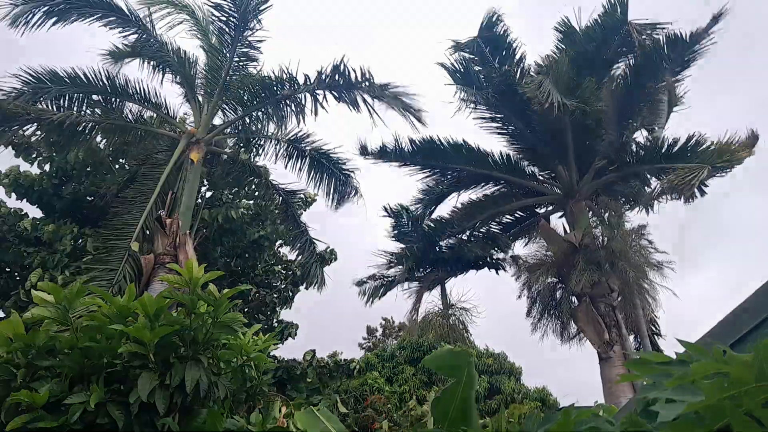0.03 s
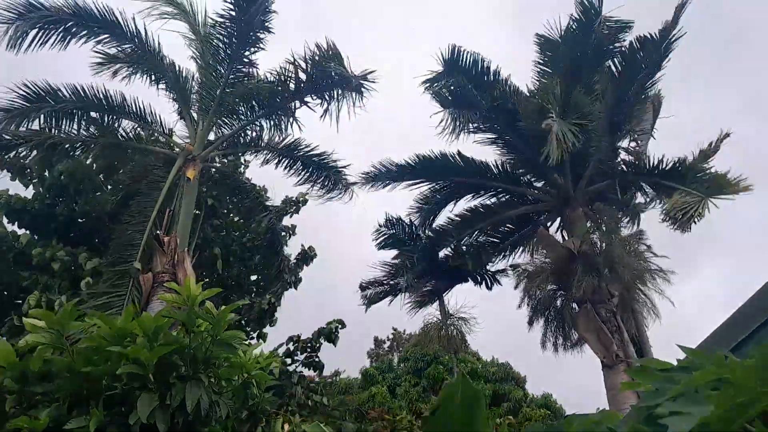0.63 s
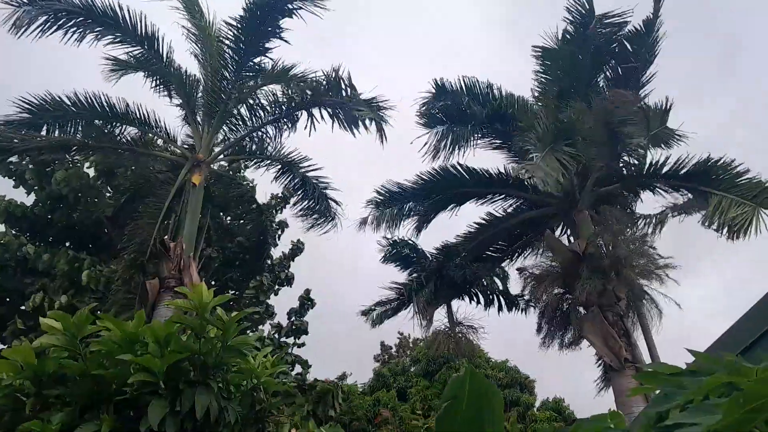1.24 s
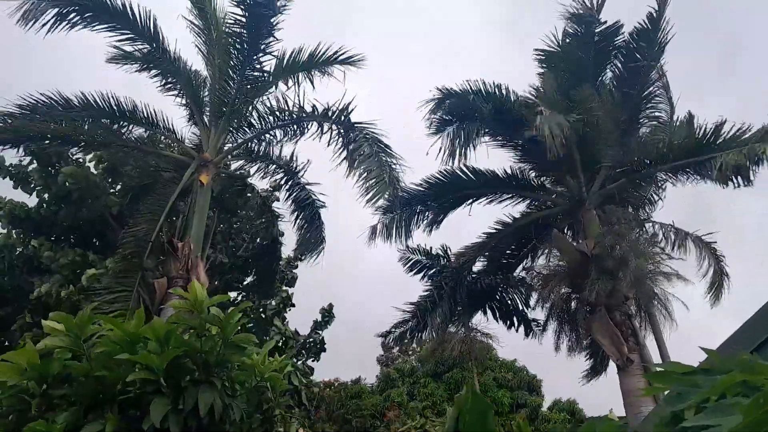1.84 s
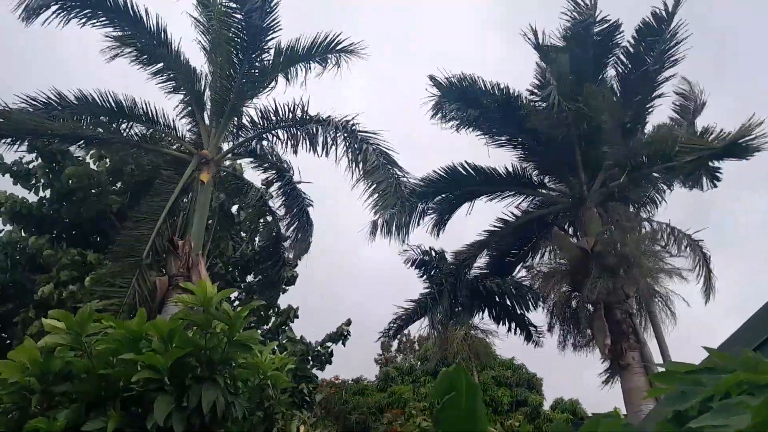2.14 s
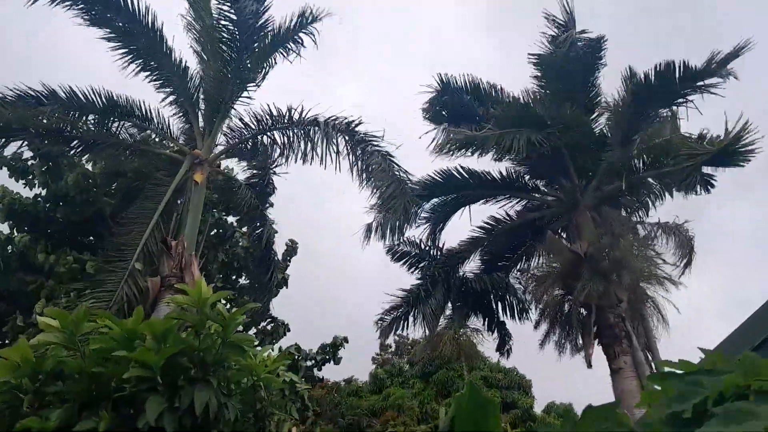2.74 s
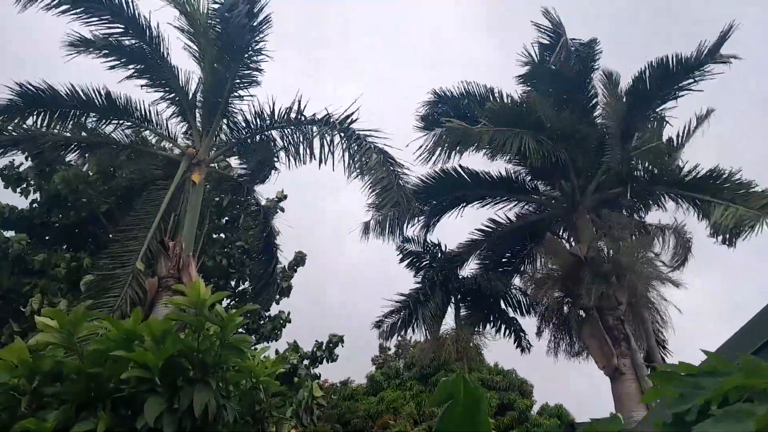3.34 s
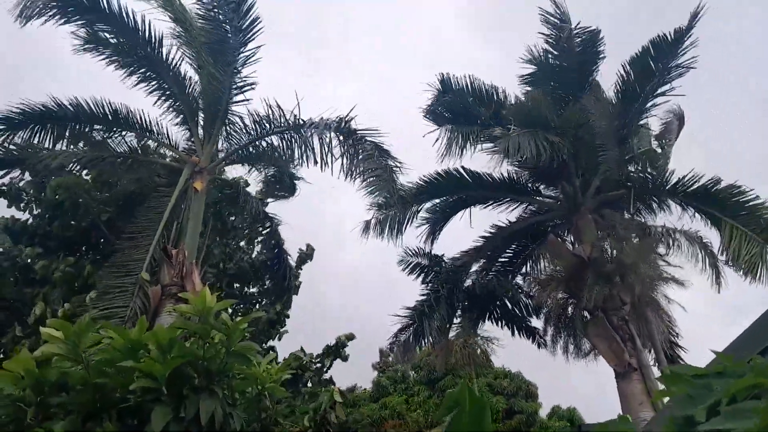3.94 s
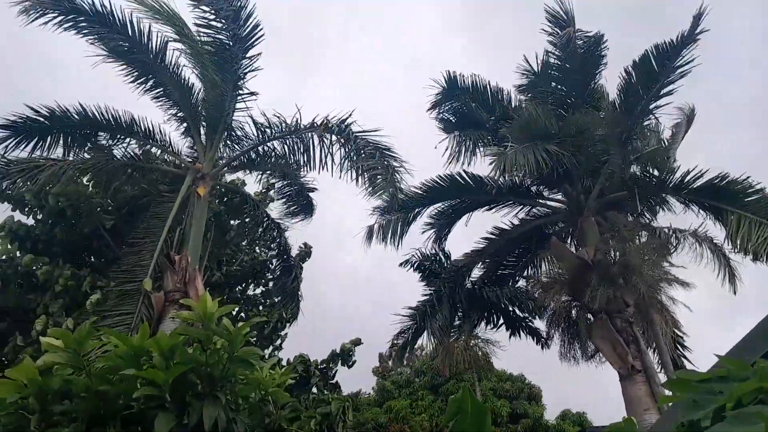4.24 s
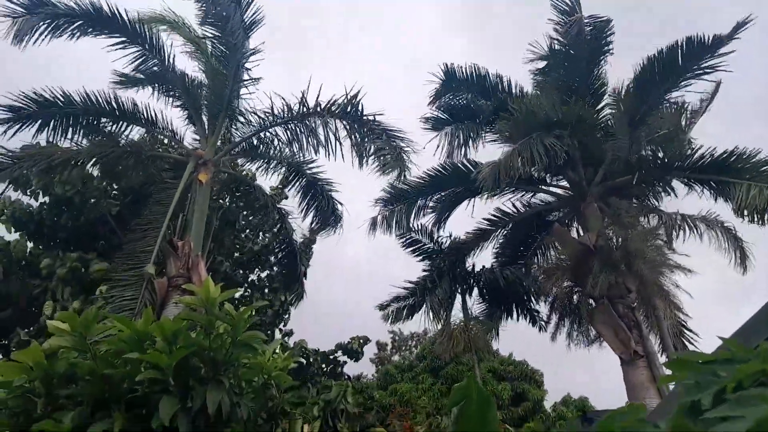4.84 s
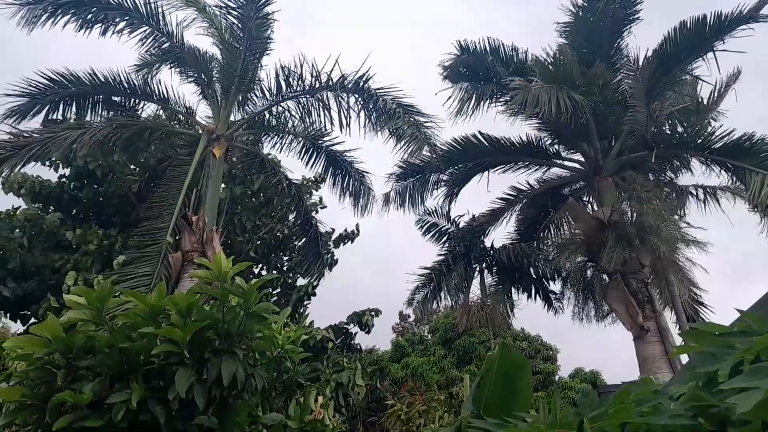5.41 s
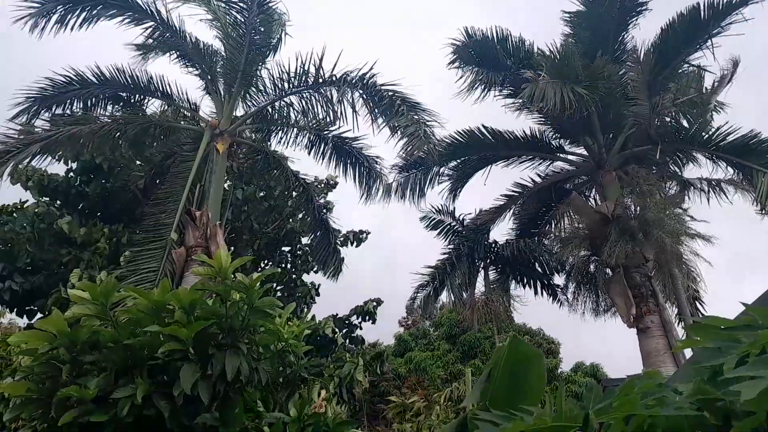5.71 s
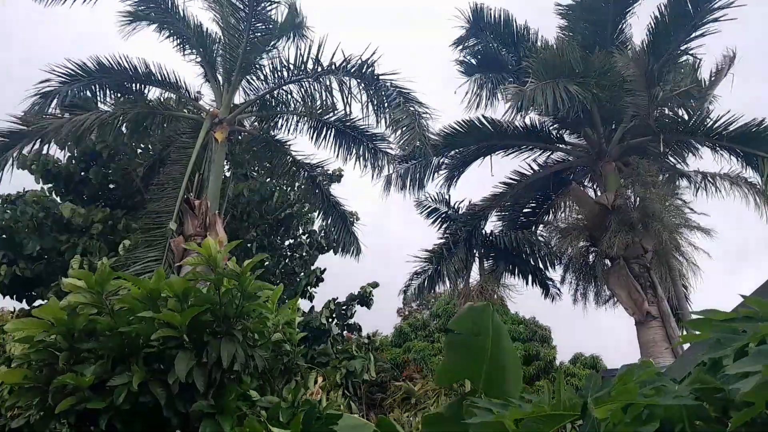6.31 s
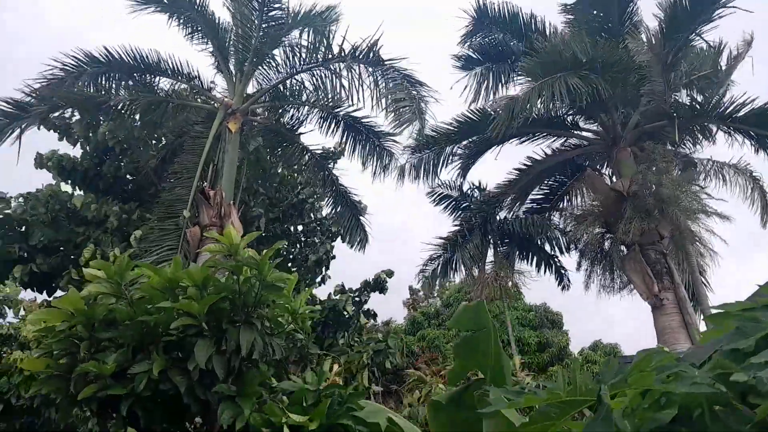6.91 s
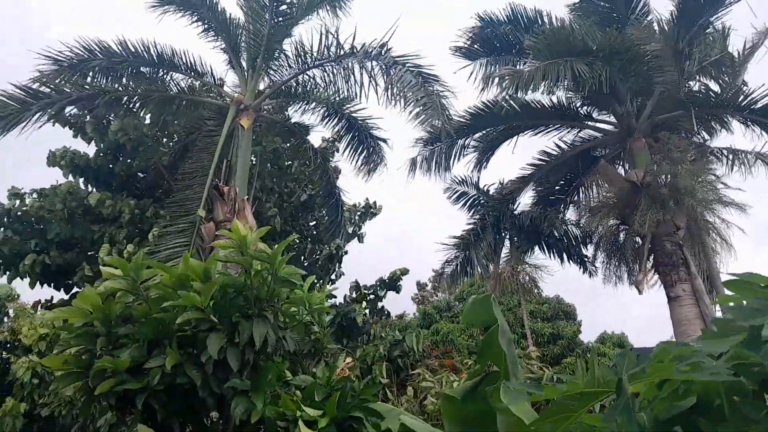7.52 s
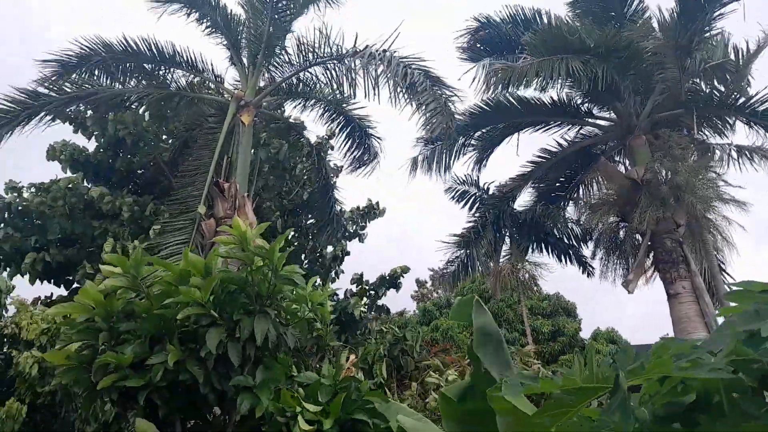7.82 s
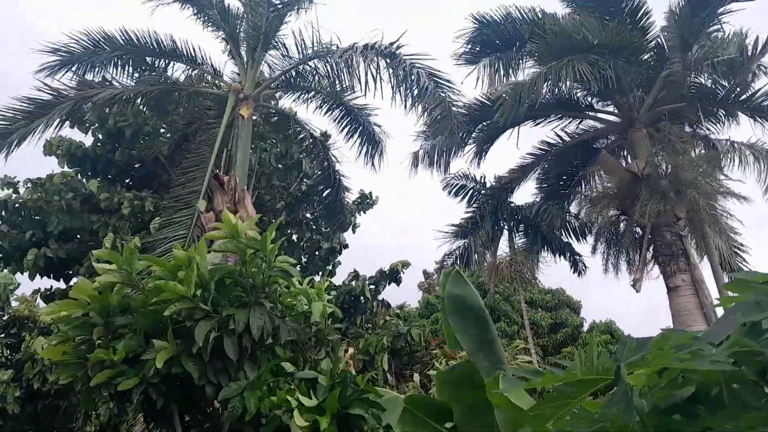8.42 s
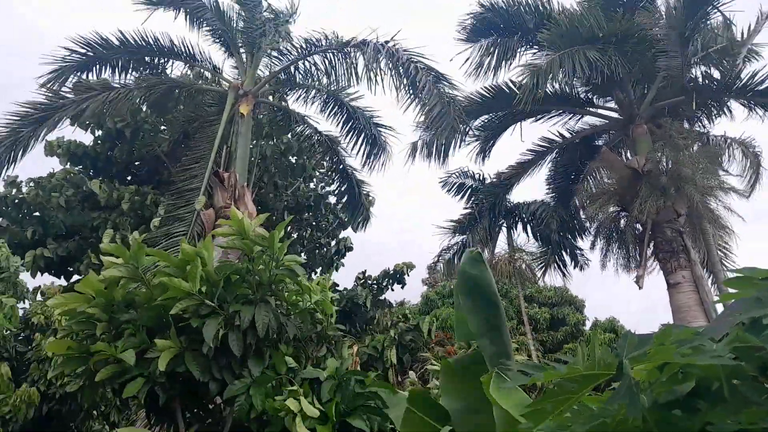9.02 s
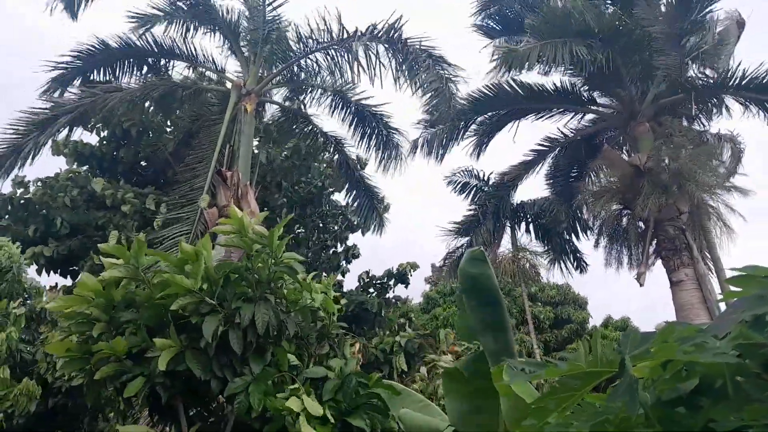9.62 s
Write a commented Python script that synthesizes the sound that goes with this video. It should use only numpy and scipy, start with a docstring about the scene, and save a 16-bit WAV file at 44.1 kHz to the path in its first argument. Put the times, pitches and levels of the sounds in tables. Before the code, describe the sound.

Wind rushes through palms and shrubs, buffeting the microphone in two gusts before settling into softer rustling.

```python
"""Strong wind on a stereo microphone, in a garden of palms and shrubs. Two gusts strike it,
and its two ports rumble and thump each on its own; then the wind eases and starts to build again.
All around, palm leaflets hiss and tick and broad leaves rush; farther off, trees roar.
Close by, a frond whips round in the first gust. Stalks knock twice, and there is one faint peep."""
import sys
import numpy as np
from scipy import signal
from scipy.fft import rfft, irfft, next_fast_len
from scipy.io import wavfile
from scipy.ndimage import uniform_filter1d, map_coordinates

SR = 44100
rng = np.random.default_rng(int(sys.argv[2]) if len(sys.argv) > 2 else 0)


def unload_wav(signal):
    """Save mono or channel-first audio to the path in sys.argv[1] as 16-bit WAV at rate SR, clipped to [-1, 1]."""
    wavfile.write(
        sys.argv[1],
        SR,
        np.round(np.clip(np.atleast_2d(signal).T, -1, 1) * 32767).astype(np.int16),
    )


N = 426006
TIME = np.arange(N) / SR


def amp(db):
    """Decibels to gain."""
    return 10 ** (np.asarray(db) / 20)


def unit(x):
    """Scale to rms 1."""
    return x / np.sqrt(np.mean(x ** 2) + 1e-20)


def along(points, hz):
    """(Hz, value) points read on a log axis."""
    freqs, values = np.transpose(points)
    return np.interp(np.log(hz + 1), np.log(freqs + 1), values)


def lookup(points, x):
    """(x, value) points joined by straight lines."""
    return np.interp(x, *np.transpose(points))


def bump(centre_s, half_s):
    """A bell curve in time, peaking at 1."""
    return np.exp(-((TIME - centre_s) / half_s) ** 2)


def wobble(rate):
    """A smooth random curve, rate knots a second."""
    return map_coordinates(rng.standard_normal(int(N * rate / SR) + 4), [TIME * rate])


def filtered(x, response):
    """x times a response of frequency."""
    size = next_fast_len(N + SR // 2)
    return irfft(rfft(x, size) * response(np.fft.rfftfreq(size, 1 / SR)), size)[..., :N]


def coloured(x, spectrum):
    """x shaped by a spectrum, at rms 1."""
    return unit(filtered(x, lambda hz: amp(along(spectrum, hz))))


def panned(db):
    """Left and right gains for a level difference."""
    return amp(np.array([[1], [-1]]) * db / 2)


def patchy(depth_db):
    """Two noises whose level drifts in patches of time and frequency."""
    bands = signal.stft(rng.standard_normal((2, N)), nperseg=512)[2]
    patches = uniform_filter1d(rng.standard_normal(bands.shape[1:]), size=7, axis=0)
    patches = unit(uniform_filter1d(patches, size=14, axis=1))
    return unit(signal.istft(bands * amp(depth_db * patches), nperseg=512)[1][:, :N])


def shared_speckle(pair, depth_db):
    """A fine, random level flicker in narrow bands, the same in both channels."""
    bands = signal.stft(pair, nperseg=1024)[2]
    flicker = unit(uniform_filter1d(rng.standard_normal(bands.shape[1:]), size=2, axis=0))
    bands *= amp(depth_db * np.minimum(flicker, 2))
    return unit(signal.istft(bands, nperseg=1024)[1][:, :N])


def ticks(per_s, spread_db, t60):
    """Leaflets slap each other: tiny noise bursts of uneven size with a sharp start."""
    size_db = spread_db * np.minimum(rng.exponential(size=N), 4)
    blows = (rng.random(N) < per_s / SR) * amp(size_db)
    decay = amp(-60 * TIME[:SR // 8] / t60)
    power = signal.fftconvolve(blows ** 2, decay ** 2)[:N]
    return unit(np.sqrt(np.abs(power)) * rng.standard_normal((2, N)))


def turbulence(spectrum, even_s):
    """Pressure swings, unrelated at the two ports, of even strength over even_s seconds."""
    pressure = coloured(rng.standard_normal((2, N)), spectrum)
    span = int(even_s * SR)
    power = uniform_filter1d(uniform_filter1d(pressure ** 2, span), span)
    return unit(pressure / np.sqrt(np.abs(power) + 1e-4))


# Sound from all around the microphone. Each row: frequency in Hz, left-right correlation.
PORT_LIKENESS = [(100, .97), (400, .88), (700, .74), (1000, .42), (1350, -.02), (1750, -.12), (2500, .12),
                 (3000, -.3), (3800, 0)]

def surrounding(pair, spectrum):
    """A diffuse field: long waves are alike at both ports, short ones unrelated."""
    def mid_side_gains(hz):
        angle = np.arccos(along(PORT_LIKENESS, hz)) / 2
        return np.array([np.cos(angle), np.sin(angle)])
    mid, side = filtered(pair, mid_side_gains)
    return coloured(np.array([mid + side, mid - side]), spectrum)


# The ports' unequal treble. Each row: frequency in Hz, left minus right in dB.
PORT_COLOUR = [(2500, 1), (3500, 2.3), (5000, -0.5), (7700, -0.3), (10000, 0.5), (14000, -1)]

def at_the_ports(pair, lag_ms):
    """Sound from one side reaches the left port a little later; each port adds its colour."""
    lag = lambda hz: np.exp(-1j * np.pi * hz * lag_ms / 1000 * np.array([[1], [-1]]))
    return filtered(pair, lambda hz: lag(hz) * panned(along(PORT_COLOUR, hz)))


# A thin peep. Each row: centre in seconds, level in dB, pitch in Hz, half length in seconds.
PEEPS = [(6.285, -62, 5390, 0.045)]

def bird():
    """One soft, nearly steady whistle, perhaps a distant bird."""
    drift = np.cumsum(12 * wobble(40)) / SR
    return sum(amp(db) * bump(s, half_s) * np.sin(2 * np.pi * (hz * TIME + drift))
               for s, db, hz, half_s in PEEPS)


# Wind out in the garden. Each row: time in seconds, strength in dB.
GARDEN_WIND = [(.51, -65.5), (.6, -54), (.72, -47), (1.05, -46), (1.45, -48.5), (2.03, -49.5), (2.11, -55),
               (2.5, -53), (3.1, -57), (3.4, -55), (4.4, -57.5), (4.85, -57), (5.07, -59.5), (6.5, -60),
               (7.3, -59), (8.05, -59.5), (8.2, -58.5), (9.2, -57), (9.62, -54)]
# How freely leaves flutter. Each row: wind above a breeze in dB, share of the flutter.
FLUTTER_SHARE = [(0, 1), (4, .35)]

def garden_wind(breeze_db):
    """One wind drives all foliage: leaves flutter in a breeze and stream steadily in a gust."""
    gust_db = lookup(GARDEN_WIND, TIME) - breeze_db
    flutter_db = lookup(FLUTTER_SHARE, gust_db) * (.3 * wobble(14) + .15 * wobble(5))
    return gust_db, flutter_db


# Brief dips of the low end. Each row: centre in seconds, depth in the rumble in dB.
LOW_DIPS = [(.94, 0.5), (1.2, 6), (1.49, 12), (1.56, 5), (1.67, 8), (1.77, 6), (1.82, 6), (3.55, 9),
            (3.75, 12), (3.92, 5), (3.98, 4), (4.13, 3), (5.08, 16), (5.32, 7), (5.45, 7), (6.15, 4),
            (7.33, 13), (7.54, 4), (7.79, 7), (8.05, 14), (8.86, 16), (9.49, 13)]

def lulls():
    """How far the low end dips at each moment, in dB."""
    return sum(db * bump(s, half_s=.041) for s, db in LOW_DIPS)


# Branches around the microphone. Each row: centre in seconds, change of the leaf rush in dB.
BRANCH_SWEEPS = [(2.22, 0.5), (3.83, 1.5), (4.07, 3), (4.65, 2), (5.19, 1.5), (5.67, 2.3), (6.67, 1.3),
                 (7.16, 1), (7.73, -0.7), (9.6, 2)]

def swishes():
    """Single branches sweep through the leaves and shift their level, in dB."""
    return sum(db * bump(s, half_s=.095) for s, db in BRANCH_SWEEPS)


# Trees from a distance. Each row: frequency in Hz, spectral density in dB.
ROAR_SPECTRUM = [(30, -18), (70, 2.5), (130, 1.5), (220, 0), (320, 0.5), (500, -1.5), (680, -3.5),
                 (880, -15.5), (1400, -15), (3000, -39)]
# The far crowns feel the gusts at other moments. Each row: time in seconds, change of the roar in dB.
FAR_GUSTS = [(.8, -1), (1.4, 0), (2.05, -1.5), (2.5, 1.5), (3.9, 1.6), (4.9, 1.2), (5.1, 0.5), (6.6, 1.9),
             (8.1, 0), (9.15, -0.5), (9.48, 2.5), (9.6, 4.5)]

def far_trees(gust_db, flutter_db):
    """Distant crowns roar low as the wind goes through them."""
    wind_db = -52.5 + .81 * gust_db + lookup(FAR_GUSTS, TIME)
    sway_db = flutter_db + .4 * wobble(9) + .4 * swishes() - .35 * lulls()
    crowns = shared_speckle(patchy(depth_db=.6), depth_db=2)
    return surrounding(crowns, ROAR_SPECTRUM) * amp(wind_db + sway_db)


# Shrubs around the microphone. Each row: frequency in Hz, spectral density in dB.
RUSH_SPECTRUM = [(250, -29), (600, -3), (1000, -1), (1300, -2), (2000, -0.5), (2550, -3), (3000, -6.5),
                 (4000, -11), (7000, -31)]
# The first gust tosses the shrubs on the left. Each row: time in seconds, left minus right in dB.
RUSH_BALANCE = [(2.03, 3.5), (2.1, -1)]

def leaf_rush(gust_db, flutter_db):
    """Broad leaves rush and flap, fluttering more deeply than narrow leaflets."""
    flaps = ticks(per_s=300, spread_db=2.2, t60=.04)
    leaves = shared_speckle(patchy(depth_db=.6) + amp(-3.5) * flaps, depth_db=2.8)
    shiver_db = 1.3 * flutter_db + .7 * lookup(FLUTTER_SHARE, gust_db) * wobble(45)
    level_db = -50.5 + 1.077 * gust_db + swishes() + shiver_db - .14 * lulls()
    return surrounding(leaves, RUSH_SPECTRUM) * amp(level_db) * panned(lookup(RUSH_BALANCE, TIME))


# Palms on every side, as the microphone hears them; it lifts the treble near 7.9 kHz. Each row: frequency in
# Hz, spectral density in dB.
HISS_SPECTRUM = [(1500, -9), (2800, -4.5), (3500, -2), (4200, -1.5), (5200, 1), (6300, -0.6), (7200, 1.5),
                 (7900, 3.5), (8400, 0), (9000, -4.5), (10200, -6), (13000, -4), (15800, -6.5)]
# The level of the highest treble, above 8.7 kHz, drifts slowly. Each row: time in seconds, gain in dB.
TREBLE_DRIFT = [(1.3, -1.5), (3.3, 2), (5, 0.9), (6.4, -0.4), (7.8, 1.5), (9.6, 1)]

def palm_hiss(gust_db, flutter_db, treble_hz=8700):
    """Narrow palm leaflets hiss in the wind and tick against each other."""
    slaps = ticks(per_s=260, spread_db=3.1, t60=.03)
    leaflets = unit(patchy(depth_db=1.1) + amp(-6) * slaps)
    hiss = surrounding(leaflets, HISS_SPECTRUM) * amp(-51 + .97 * gust_db + flutter_db)
    treble = filtered(hiss, lambda hz: hz > treble_hz)
    return hiss + (amp(lookup(TREBLE_DRIFT, TIME)) - 1) * treble


# Frond stalks. Each row: start in seconds, level in dB, pitch in Hz, left minus right in dB.
STALK_KNOCKS = [(0.804, -29.5, 1150, 9), (9.386, -42, 620, 1)]

def stalk_knocks(t60=.017):
    """Stiff stalks clack: a short burst in one broad woody resonance."""
    out = np.zeros((2, N))
    for start, db, hz, side_db in STALK_KNOCKS:
        age = TIME - start
        resonance = lambda f: 1 / (1 + 2j * (f / hz - hz / (f + 1))) ** 2
        wood = unit(filtered(rng.standard_normal(N), resonance))
        clack = wood * (age > 0) * amp(db - 60 * np.abs(age) / t60)
        out += panned(side_db) * filtered(clack, lambda f: 1 / (1 + (f / (2 * hz)) ** 4))
    return out


# A frond close by, to the left. Each row: centre in seconds, level in dB, half length in seconds.
FROND_WHIPS = [(0.812, -40, 0.012), (0.843, -48, .015), (0.95, -50, .14)]
# Its clatter. Each row: frequency in Hz, spectral density in dB.
CLATTER_SPECTRUM = [(400, -23), (950, 4), (2300, -2), (3700, -1), (5500, -15), (8000, -8), (15000, -27)]

def near_frond():
    """A frond whips round: all its leaflets clatter together in a broad, bright burst."""
    swell = sum(amp(db) * bump(s, half_s) for s, db, half_s in FROND_WHIPS)
    clatter = coloured(ticks(per_s=980, spread_db=1, t60=.014), CLATTER_SPECTRUM)
    return swell * clatter * panned(db=4)


# Air over the microphone: two gusts, then a light draught. Each row: time in seconds, strength in dB.
MIC_FLOW = [(.52, -50), (.6, -34), (.82, -29), (.95, -33), (1.3, -32), (1.5, -31), (1.95, -35.5),
            (2.12, -51), (2.55, -51), (2.85, -50.5), (3.2, -43.5), (3.48, -31.5), (3.75, -40), (4.08, -49),
            (4.35, -58), (5.6, -66), (7, -59), (8.4, -58.5), (9.66, -59.5)]
# Which port it strikes harder. Each row: time in seconds, left minus right in dB.
FLOW_BALANCE = [(.6, -6), (1.15, 8.5), (2.03, 6.5), (2.2, -17), (3, -1), (3.8, -15), (4.5, -11)]
# Rumble right at the ports. Each row: frequency in Hz, spectral density in dB.
RUMBLE_SPECTRUM = [(15, -50), (30, -15), (50, 2.5), (90, 2.5), (130, -11.5), (180, -17.5), (250, -21.5),
                   (400, -24.5), (800, -53), (2000, -91)]

def port_rumble():
    """Air tumbles over each port in a lumpy rumble; weak flow breaks up into separate puffs."""
    flow_db = lookup(MIC_FLOW, TIME)
    swing_db = np.interp(flow_db, [-52, -32], [7, 4])
    # the lumps are partly shared by both ports, and dip deeper than they rise
    own = np.array([wobble(27) + wobble(7.2), wobble(27) + wobble(9.9)])
    lumps = np.minimum(unit(wobble(17) + own), .99)
    level_db = flow_db - 2.5 + swing_db * lumps - lulls()
    return turbulence(RUMBLE_SPECTRUM, even_s=.11) * amp(level_db) * panned(lookup(FLOW_BALANCE, TIME))


# Eddies hitting the ports. Each row: centre in seconds, left and right strength in dB.
PORT_EDDIES = [(.569, -53, -36.5), (.612, -49, -34), (.672, -31.5, -46), (.716, -37, -28), (.755, -24, -22),
               (0.786, -16, -26), (.814, -13.5, -36), (.835, -15, -15), (.856, -18, -17),
               (.904, -20.5, -39), (.985, -30, -20), (1.022, -18.5, -17), (1.073, -15, -38),
               (1.088, -10.5, -41), (1.101, -13, -44), (1.131, -11.5, -48), (1.158, -12.5, -42),
               (1.174, -19, -40), (1.233, -25.5, -34), (1.271, -21, -30), (1.308, -27, -23.5),
               (1.347, -25, -30), (1.416, -23, -47), (1.452, -20.5, -50), (1.534, -48, -20.5),
               (1.574, -43, -23.5), (1.601, -16, -38), (1.624, -16, -45), (1.69, -29, -48),
               (1.749, -17.5, -19.5), (1.797, -17, -27), (1.851, -15.5, -45), (1.877, -16.5, -45),
               (1.909, -20.5, -27), (1.948, -18.5, -27), (2.02, -27, -42), (2.038, -24, -42),
               (2.09, -55, -38), (2.2, -60, -37), (2.335, -46, -34), (2.52, -46, -37), (3.006, -36, -50),
               (3.047, -39, -35), (3.088, -21, -31), (3.14, -30, -34), (3.202, -15.5, -16),
               (3.248, -14.5, -17), (3.323, -32, -31), (3.372, -20.5, -23), (3.437, -24.5, -21.5),
               (3.476, -23, -23), (3.506, -48, -25), (3.539, -54, -27.5), (3.584, -17, -22.5),
               (3.603, -27, -21), (3.668, -24.5, -36), (3.72, -53, -41), (3.828, -32, -27.5),
               (3.876, -34, -48), (4.025, -33, -25), (4.076, -35, -37), (4.186, -44, -45),
               (4.242, -40, -42), (4.49, -48, -49), (4.528, -49, -50), (5.13, -47, -62), (5.209, -42, -55),
               (5.565, -45.5, -45), (5.689, -44, -44), (5.72, -50, -50), (5.955, -51, -52),
               (6.345, -46, -54), (6.503, -50, -47), (6.83, -49, -48), (7.11, -45, -45), (7.13, -44, -45),
               (7.152, -41, -45), (7.269, -44, -45), (7.6, -52, -49), (7.709, -48, -48), (7.964, -43, -41),
               (8.113, -51, -46), (8.185, -47, -49), (8.221, -44, -46), (8.43, -48, -47), (8.467, -44, -46),
               (8.5, -48, -48), (8.653, -49, -47), (8.717, -42, -41), (8.796, -43, -53), (9.007, -45, -53),
               (9.048, -58, -45), (9.438, -44, -44)]
# Slower eddies take longer to pass. Each row: strength in dB, half length of the thump in seconds.
THUMP_HALF_LENGTH = [(-49, 0.012), (-21, 0.0088), (-9.5, 0.0088)]
# Faster eddies are tighter and slap more. Each row: strength in dB, slap relative to it in dB.
SLAP_GAIN = [(-40, -34), (-16.5, -20.5), (-15.5, -11.5), (-13, -3.5)]
# In weak wind the soft, dull low thumps sound alike in both channels.
# Each row: flow in dB, share of thump power common to both.
SHARED_THUMP_SHARE = [(-53.5, 0.96), (-43.5, 0.03)]
# A thump at one port, a shared thump and a slap. Each row: frequency in Hz, spectral density in dB.
THUMP_SPECTRUM = [(15, -57), (32, -29), (52, 0.5), (92, 3.5), (150, -3), (215, -12.5), (290, -27),
                  (450, -47), (1500, -81)]
SHARED_THUMP_SPECTRUM = [(20, -30), (40, -2), (70, 4), (100, 1), (150, -11), (260, -24), (600, -60)]
SLAP_SPECTRUM = [(80, -21), (170, 1.5), (250, 4), (400, -14.5), (560, -20.5), (850, -37), (2500, -76)]

def eddy_thumps():
    """Each eddy is a brief low thump; the faster it is, the more it adds a shorter, brighter slap."""
    thump_power, slap_power = np.zeros((2, 2, N))
    for s, left_db, right_db in PORT_EDDIES:
        strength_db = max(left_db, right_db)
        power = amp([[left_db], [right_db]]) ** 2
        thump_power += power * bump(s, lookup(THUMP_HALF_LENGTH, strength_db))
        slap_power += power * amp(lookup(SLAP_GAIN, strength_db)) ** 2 * bump(s, half_s=.0033)
    own = turbulence(THUMP_SPECTRUM, even_s=.009)
    common = turbulence(SHARED_THUMP_SPECTRUM, even_s=.012)[0]
    share = lookup(SHARED_THUMP_SHARE, lookup(MIC_FLOW, TIME))
    low = np.sqrt(1 - share) * own + np.sqrt(share) * common
    bright = turbulence(SLAP_SPECTRUM, even_s=.005)
    return amp(-2.5) * np.sqrt(thump_power) * low + np.sqrt(slap_power) * bright


def low_cut(x, corner_hz):
    """The microphone does not follow the slowest pressure swings."""
    return filtered(x, lambda hz: 1 / np.sqrt(1 + (corner_hz / (hz + 1)) ** 6))


def scene():
    """The garden all around, and in front of it the wind on the microphone itself."""
    wind = garden_wind(breeze_db=-55)
    foliage = palm_hiss(*wind) + leaf_rush(*wind) + far_trees(*wind)
    garden = at_the_ports(foliage, lag_ms=.038) + near_frond() + stalk_knocks() + bird()
    return garden + low_cut(port_rumble() + eddy_thumps(), corner_hz=37)


def record(dry):
    """The sound opens quickly after half a second of silence; the highest treble is cut off."""
    start_s, fade_s, top_hz = .505, .0076, 15830
    opening = np.clip((TIME - start_s) / fade_s, 0, 1)
    return filtered(dry * opening, lambda hz: hz < top_hz)


dry = scene()
out = record(dry)
unload_wav(out)
```